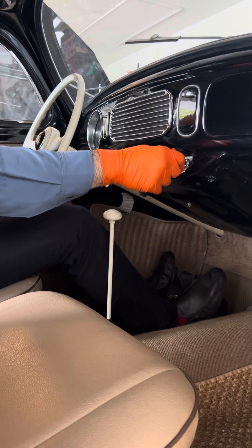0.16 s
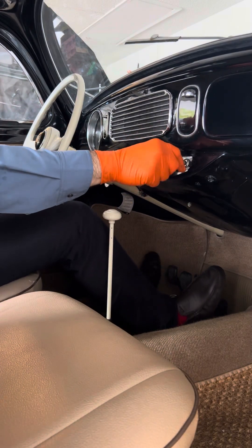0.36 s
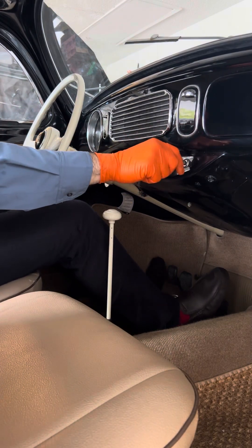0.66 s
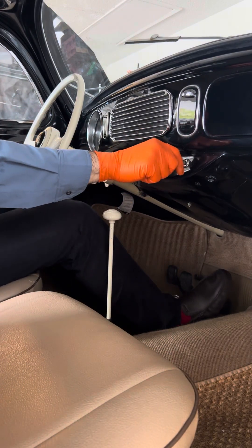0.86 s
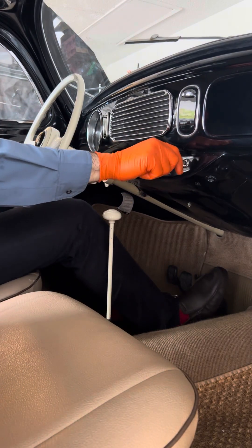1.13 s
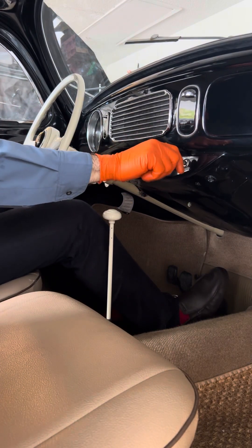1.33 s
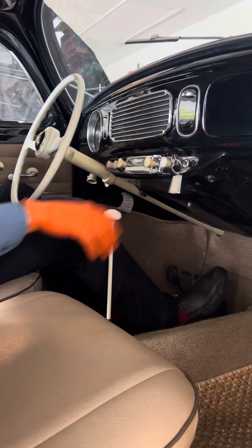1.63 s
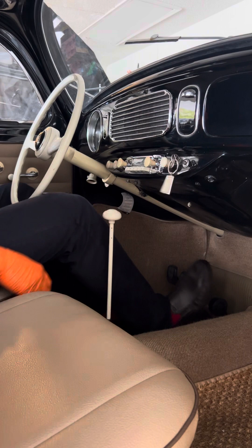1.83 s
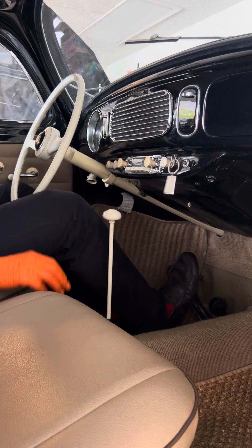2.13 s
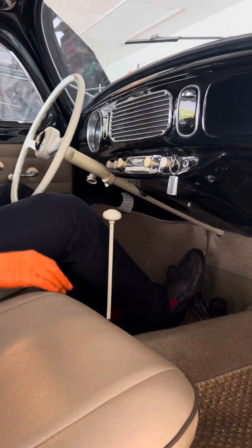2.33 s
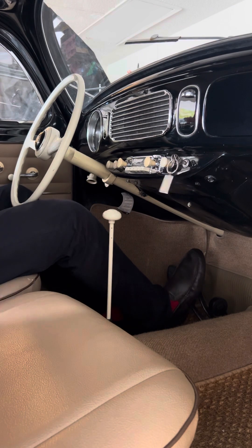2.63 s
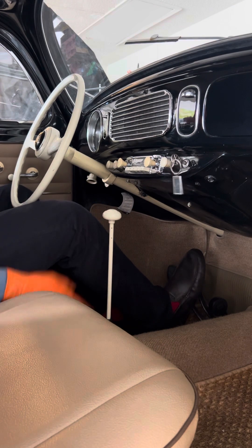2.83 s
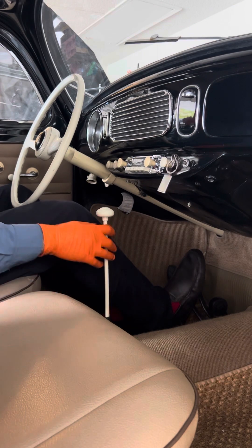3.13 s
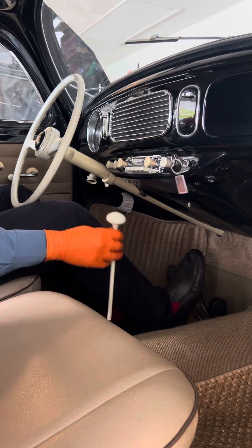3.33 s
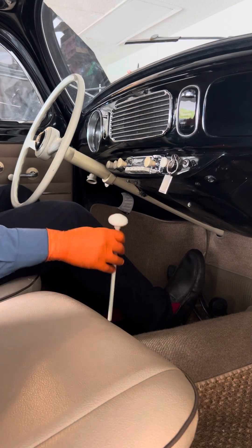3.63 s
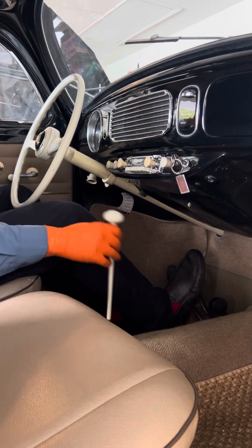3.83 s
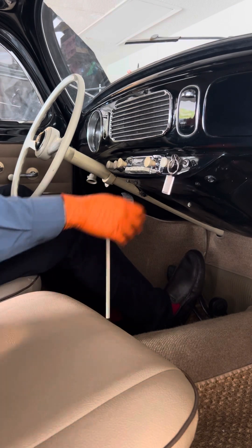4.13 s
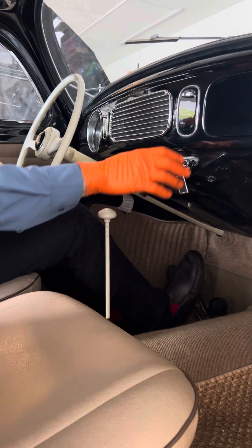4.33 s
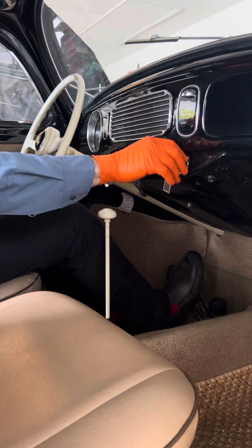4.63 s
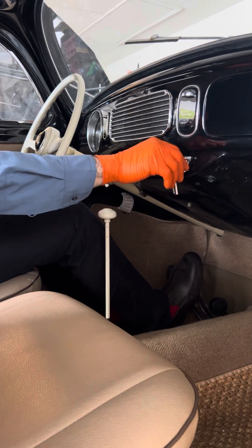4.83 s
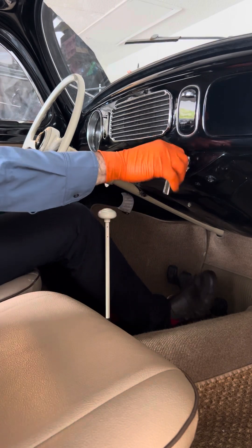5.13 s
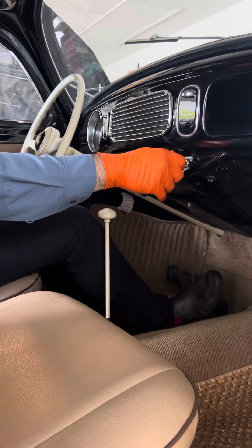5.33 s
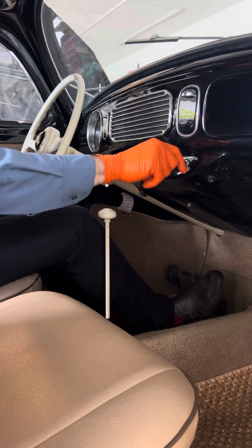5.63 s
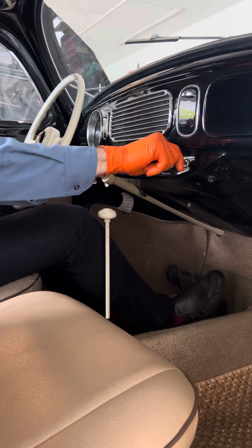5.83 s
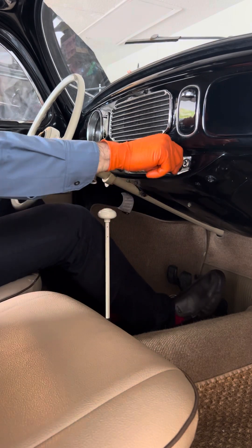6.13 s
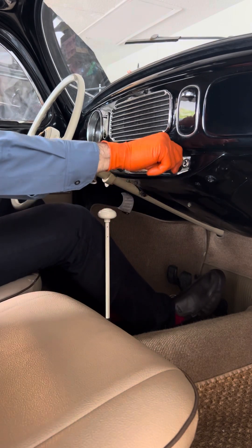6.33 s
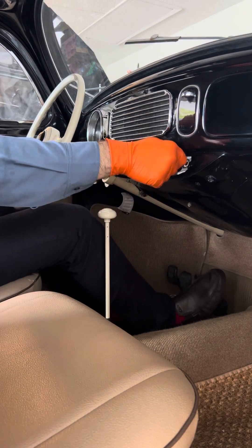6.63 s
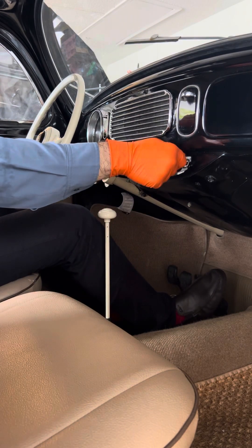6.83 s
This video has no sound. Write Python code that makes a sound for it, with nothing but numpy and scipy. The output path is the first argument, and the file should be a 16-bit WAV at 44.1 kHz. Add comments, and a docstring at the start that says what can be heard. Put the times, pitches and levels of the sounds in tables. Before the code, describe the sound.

Close inside a small, quiet old car: shoe soles creak on pedals, cloth rustles and the floor thuds softly. A dashboard switch snaps back sharply. A gear lever is waggled in neutral, clunking and rattling loudly through the steel floor. Keys jingle faintly, the ignition lock clicks, and at the very end the starter engages with a rasp and low electric hum, ending abruptly.

```python
"""Starting an old car

Inside an old air-cooled car, the driver treads the pedals, lets a dashboard switch snap back and waggles
the gear lever in neutral, which knocks through the steel floor. The keys jingle, the ignition lock clicks
round, and the starter engages and begins to turn the engine. Blows are dying tones and short noise bursts,
rubbing and scraping are shaped noise, and the starter is a hum with a rasp. A small cabin adds its echo."""
import sys
import numpy as np
from scipy import signal
from scipy.fft import rfft, irfft
from scipy.io import wavfile
from scipy.ndimage import uniform_filter1d

SR = 44100
rng = np.random.default_rng(int(sys.argv[2]) if len(sys.argv) > 2 else 0)


def master(y):
    """Save y as 16-bit WAV."""
    cut = np.clip(np.atleast_2d(y).T, -1, 1)
    pcm = np.round(cut * 32767)  # scale
    wavfile.write(sys.argv[1], SR, pcm.astype(np.int16))


N = 306936
TIME = np.arange(N) / SR  # seconds
AGE = TIME[:SR // 2]  # seconds since a blow

# In all tables, t60_s is the time to die away by 60 dB.
# In colours and modes, level_db counts only relative to the other rows.

# the quiet cabin's air: pitch_hz, level_db (per Hz)
AIR_COLOUR = [(20, -21), (44, -4.5), (106, -4.5), (165, -13), (320, -21.5), (620, -35), (900, -39.5),
              (2700, -46.5), (4000, -52.5), (16000, -72)]
AIR_DB = -48
# the car sways on its springs while the lever is shaken: peak_s, half_width_s, level_db
SWAYS = [(3.54, 0.045, -29.5), (3.831, 0.03, -27.5), (4.06, 0.043, -29)]
SWAY_HZ = 46
# faint thin whistles: peak_s, pitch_hz
WHISTLES = [(5.78, 2580), (5.92, 2600), (6.53, 2530)]
# how fast each band of the cabin's echo dies: pitch_hz, t60_s
CABIN_ECHO = [(100, 0.76), (800, 0.17), (3000, 0.4), (15000, 0.17)]

# sleeve, glove and seat rubbing: start_s, length_s, level_db, brightness_db_per_octave
RUBS = [(0.064, 0.23, -58.5, 0), (0.414, 0.23, -62, 1.5), (0.635, 0.12, -52.5, -.5),
        (0.869, 0.088, -44.5, -4), (1.523, 0.25, -61, -1), (1.656, 0.64, -59.5, -.5),
        (2.038, 0.11, -52, -2), (2.223, 0.28, -60.5, 2), (2.41, 0.25, -50, -2), (2.525, 0.026, -50.5, 5),
        (2.574, 0.1, -60, 3.5), (2.648, 0.17, -63.5, 5.5), (4.302, 0.59, -58, -1), (4.92, 0.06, -54.5, -1)]
# rubbing cloth: pitch_hz, level_db (per Hz)
RUB_COLOUR = [(200, 17), (800, 2), (2200, -4), (4000, -8), (7500, -10.5), (10000, -28.5), (16000, -25.5)]

# feet, pedals and the heel of the lever thudding on the floor: start_s, level_db, pitch_hz
THUDS = [(0.695, -38, 149), (0.731, -32, 104), (0.82, -33.5, 137), (0.857, -29.5, 91), (0.923, -33, 107),
         (1.853, -32.5, 142), (2.105, -30.5, 109), (2.452, -37, 144), (3.018, -21, 145), (3.71, -21, 125),
         (4.973, -30, 151)]
THUD_T60_S = .11
# the floor drones while a pedal is pushed down
DRONE_START_S, DRONE_LENGTH_S, DRONE_HZ, DRONE_DB = 5.02, 0.21, 96, -44
# rubber soles stick and slip on the pedals: slip_s, level_db
CREAKS = [(.023, -34), (.042, -34.5), (.29, -34), (.321, -42), (.358, -35.5), (.398, -41), (.45, -39.5),
          (.484, -36.5), (.823, -35), (.987, -43), (1.032, -45), (1.845, -32), (1.857, -34.5),
          (1.985, -38.5), (2.018, -34), (5.17, -41.5)]
# creaking soles, also used for fidgeting: pitch_hz, level_db (per Hz)
CREAK_COLOUR = [(100, -21), (230, -2), (380, 5.5), (500, -6.5), (700, -17), (1200, -21.5), (2200, -24),
                (16000, -64)]

# the key bunch swinging: start_s, level_db
JINGLES = [(1.645, -56), (4.396, -51.5), (4.441, -57.5), (4.46, -56), (4.567, -52), (5.136, -62.5)]
# ringing of the keys: pitch_hz, level_db, t60_s
KEY_MODES = [(5264, 1.5, 0.039), (6900, -6, 0.026), (8670, -4.5, 0.03), (12400, -6, 0.023),
             (13500, -12, 0.03)]
TINKLE_SPAN_S, TINKLE_DB = (4.37, 4.7), -66  # lighter touches while the hand gathers the keys

# light taps of small hard parts (key, knobs, trim, linkage): start_s, level_db, ring_hz
TAPS = [(.675, -45.5, 2170), (.906, -48, 790), (0.9513, -48, 2380), (5.723, -57, 1970), (3.908, -34, 8500),
        (4.968, -49, 2040), (5.313, -52, 2980)]
# clicks of the switch, key and ignition lock: start_s, level_db, brightness_db_per_octave
CLICKS = [(1.341, -48, -3.5), (1.533, -25, 0.5), (4.968, -36.5, -5.5), (5.135, -42.5, -5),
          (5.313, -45.5, -5), (6.185, -43.5, 2), (6.242, -47, -2), (6.331, -45, -3.5), (6.359, -39, 1),
          (6.367, -35.5, -2.5), (6.577, -52, 1)]
# clicks and taps: pitch_hz, level_db (per Hz)
CLICK_COLOUR = [(100, -5), (250, 14), (760, 8), (1250, 4), (1450, -2.5), (2000, 5), (2800, 0), (4200, -2.5),
                (7600, -4.5), (10000, -18), (15500, -19.5)]
# ringing of the steel dashboard: pitch_hz, level_db, t60_s
DASH_MODES = [(748.3, -14.5, 0.06), (2690, -18, 0.056), (3140, -16, 0.05)]
# ring time of a neutral click; it halves for this much more brightness (dB per octave)
CLICK_T60_S, CLICK_HALVING = 0.06, 3.1
# the dashboard switch springs back; brightness in dB per octave
SWITCH_START_S, SWITCH_DB, SWITCH_BRIGHTNESS, SWITCH_T60_S = 1.4988, -17.5, 5.43, 0.052
# it rattles: each contact comes after a longer gap, weaker and duller
RATTLE_GAP_S, RATTLE_STRETCH, RATTLE_LOSS_DB, RATTLE_DULLING = 0.0041, 1.4, 3.5, 2.4

START_S = 6.598  # the starter engages
# the starter spins up, then sags under load: time_s, hum_hz
STARTER_SPEED = [(6.63, 124.6), (6.66, 129), (6.718, 171), (6.748, 181.1), (6.96, 166.2)]
# make-up of the hum: multiple_of_hum_hz, level_db
HUM_ORDERS = [(.5, -2), (1, 8.5), (2, -11)]
# the hum swells as the motor takes load: peak_s, half_width_s, level_db
SURGES = [(6.689, 0.028, -20), (6.807, 0.037, -24), (6.89, 0.019, -25)]
# strength of the gear rasp over time: time_s, level_db
RASP_LEVEL = [(6.591, -89), (6.603, -45.5), (6.631, -30), (6.659, -26), (6.708, -41.5), (6.83, -48.5),
              (6.926, -35), (6.96, -36.5)]
# gear rasp, also the touch of keys: pitch_hz, level_db (per Hz)
RASP_COLOUR = [(400, -16), (700, 1.5), (3600, 1.5), (8500, -6), (10500, -15.5), (12500, -10.5),
               (16000, -29)]
# low shudder of the starting engine: pitch_hz, level_db (per Hz)
SHUDDER_COLOUR = [(50, -8.5), (84, -3), (170, 1), (236, 0), (310, -8), (500, -1.5), (590, -14),
                  (900, -18.5), (3000, -48.5)]
# body panels ring in turn as the starter shakes them: peak_s, half_width_s, level_db, pitch_hz
PANELS = [(6.633, 0.012, -25.5, 237), (6.665, 0.038, -28.5, 528), (6.735, 0.024, -35, 484),
          (6.87, 0.033, -38, 505), (6.945, 0.016, -34, 350)]

# gear lever thrown across its gate: start_s, thump_db, clack_db
THROWS = [(3.303, -25, -40), (3.5742, -21, -38.5), (3.826, -14.5, -31.5)]
SEAT_S = 0.014  # a throw takes up the play with a light, hard tick and seats this much later
# taking up the play, one row: thump_db, clack_db, tick_db
PLAY_DB = [-34.5, -52, -40]
THROW_RING_HZ, SEAT_TICK_DB = 4800, -46
# gear lever knocking against its stops: start_s, thump_db, clack_db, steel_tick_db, steel_ring_hz
KNOCKS = [(3.021, -34, -40.5, -55, 4650), (3.035, -28, -31.5, -52.5, 4500), (3.064, -30, -37, -59, 6650),
          (3.3906, -32.5, -36, -44.5, 4680), (3.4127, -29, -45, -66, 4670), (3.4565, -23, -28, -41.5, 6560),
          (3.514, -26.5, -43, -60, 6630), (3.633, -31.5, -50, -56, 4700), (3.6804, -27.5, -35, -39.5, 6780),
          (3.7298, -20.5, -30, -37, 6700), (3.7743, -25, -42, -63, 6730), (3.8824, -21, -30, -46, 4800),
          (3.9081, -22.5, -32.5, -36.5, 6700), (3.9476, -19.5, -26, -35, 6690),
          (3.9935, -19.5, -30.5, -50, 6700)]
REBOUND_DB = -14.5  # relative to the knock
# what the lever, its linkage and the floor ring with: pitch_hz, level_db, t60_s
LEVER_MODES = [(125.3, -5, 0.37), (148.14, -3, 0.45), (167.3, -0.5, 0.27), (197, 5, 0.15),
               (236.9, 1.5, 0.19), (390.8, 1.5, 0.1), (461.3, -5, 0.095), (665, -1, 0.05),
               (1016, -1.5, 0.034), (1244, -7, 0.083), (1550, -12.5, 0.054)]
# the noisy crack of a lever blow: pitch_hz, level_db (per Hz)
LEVER_CRACK = [(60, -35), (160, 8.5), (450, 9), (800, -1.5), (1300, -2.5), (2600, -20.5), (8500, -31),
               (10000, -57), (16000, -47)]
# the cabin's boom builds up slowly and varies less than the blows (dB of boom per dB of thump)
BOOM_BASE_DB, BOOM_PER_THUMP, BOOM_RISE_S = -15, 0.38, 0.042
# the shift rod slides with every throw, louder after a hard one (dB of slide per dB of clack)
SLIDE_LAG_S, SLIDE_BASE_DB, SLIDE_PER_CLACK, SLIDE_T60_S = 0.011, -20, 0.54, 0.23
# the sliding rod: pitch_hz, level_db (per Hz)
SLIDE_COLOUR = [(500, 10), (2000, 5), (3600, 3), (7000, -5), (9500, -3), (16000, -19.5)]
# the gearbox housing sings with whatever scrapes in it
GEARBOX_HZ, GEARBOX_Q, GEARBOX_DB = [3547, 4470, 6400, 8280], 73, 6.5

# how far the left port leads, before the bass is narrowed: pitch_hz, lead_radians
PORT_PHASE = [(4600, -0.062), (5400, -1.2), (10000, -1.2), (15000, -1.6)]
# diffuse difference between the ports, before the bass is narrowed: pitch_hz, level_db
WIDTH = [(170, -12.5), (480, -1), (1000, -4), (3000, -7.5), (14000, -9)]
MIC_LOW_HZ, MIC_ORDER = 33.4, 4  # the microphone's bass roll-off
TOP_HZ = 16100  # the recorder's band limit


def amp(db):
    """Turns decibels into a plain gain."""
    return 10 ** (np.asarray(db) / 20)


def unit(x):
    """Scales a sound to rms 1."""
    return x / np.sqrt(np.mean(x ** 2) + 1e-20)


def crest(x, size=220):
    """Scales a sound so that its loudest few milliseconds have rms 1."""
    return x / np.sqrt(uniform_filter1d(x ** 2, size).max() + 1e-20)


def read(points, hz):
    """Reads a curve between its points, along a logarithmic pitch scale."""
    point_hz, value = np.transpose(points)
    return np.interp(np.log(hz + 1), np.log(point_hz + 1), value)


def add(mix, start_s, sound):
    """Adds a sound into the mix at its start time."""
    part = mix[max(round(start_s * SR), 0):][:len(sound)]
    part += sound[:len(part)]


def fade(t60_s):
    """A natural die-away after a blow."""
    return np.exp(-np.log(1000) * AGE / t60_s)


def noise(size=N):
    """Plain hiss."""
    return rng.standard_normal(size)


def burst(t60_s):
    """A dying burst of hiss, like very many modes struck at once."""
    return noise(len(AGE)) * fade(t60_s)


def waver(depth_db, size, length=N):
    """A gain that wanders at random; depth_db is its rms swing, size its smoothing in samples."""
    return amp(depth_db * unit(uniform_filter1d(noise(length), size)))


def bump(peak_s, half_width_s):
    """A smooth rise to 1 and fall again."""
    return np.exp(-((TIME - peak_s) / half_width_s) ** 2)


def swell(peak_s, half_width_s, db, hz):
    """A resonance that builds up to its peak and dies again."""
    return amp(db) * bump(peak_s, half_width_s) * np.sin(2 * np.pi * (hz * (TIME - peak_s) + rng.random()))


def level(time_s, db):
    """A gain that follows a dB curve and is silent outside it."""
    return amp(np.interp(TIME, time_s, db, left=-np.inf, right=-np.inf))


def colour(x, points, tilt=0, size=4096):
    """Causal filter of unit power with the given spectrum, tilted in dB per octave above 250 Hz."""
    hz = abs(np.fft.fftfreq(size, 1 / SR))
    gain_db = read(points, hz) + tilt * np.log2(np.maximum(hz, 250))
    log_gain = np.log(amp(gain_db))
    # the Hilbert transform gives the phase that makes the filter answer as early as possible
    response = np.fft.ifft(np.exp(np.conj(signal.hilbert(log_gain)))).real
    return signal.oaconvolve(x, response / np.linalg.norm(response))[:len(x)]


def resonate(x, hz, q):
    """One resonance of gain 1."""
    return signal.lfilter(*signal.iirpeak(hz, q, fs=SR), x)


def ring(modes, detune, spread_db):
    """Dying modes; every blow lands on another spot and so weighs and tunes them differently."""
    out = np.zeros(len(AGE))
    for hz, db, t60_s in modes:
        weigh, tune = rng.uniform(-1.15, 1, 2)
        tone = np.sin(2 * np.pi * hz * (1 + detune * tune) * AGE)
        out += amp(db + spread_db * weigh) * fade(t60_s) * tone
    return out


def through_floor(x, lag_s):
    """Bending waves in sheet steel: bass arrives late, so each blow chirps downward."""
    hz = np.fft.rfftfreq(2 * N, 1 / SR)
    turns = lag_s * (2 * np.sqrt(500 * hz) - hz / 4)  # the delay at 500 Hz is three quarters of lag_s
    return irfft(rfft(x, 2 * N) * np.exp(-2j * np.pi * turns))[:N]


def friction(grain_db=2):
    """Noise that catches and slips in grains of about a millisecond."""
    return unit(noise() * waver(grain_db, 50))


def rumble():
    """The steady air of the cabin, and its lowest resonance stirred by the swaying body."""
    return amp(AIR_DB) * colour(noise(), AIR_COLOUR) + sum(swell(*row, SWAY_HZ) for row in SWAYS)


def whistles(peak_db=-78, half_width_s=0.039, q=22):
    """Faint wavering tones, made of narrow bands of noise, that come and go."""
    out = np.zeros(N)
    for peak_s, hz in WHISTLES:
        tone = unit(resonate(resonate(noise(), hz, q), hz, q))
        out += amp(peak_db) * bump(peak_s, half_width_s) * tone
    return out


def fidgets(per_s=12, size_db=-62, t60_s=0.12, tilt=1.5, still_s=5.3):
    """Faint scuffs at random as the driver shifts in the seat, until the key is in the lock."""
    starts = (rng.random(N) < per_s / SR) * rng.random(N) * (TIME < still_s)
    strength = signal.oaconvolve(starts, fade(t60_s))[:N]
    return amp(size_db) * colour(strength * noise(), CREAK_COLOUR, tilt)


def cloth(swell_db=2.5, crackle_db=-10, crackles_per_s=70, crackle_q=5, count=10):
    """Strokes of fine friction swell and fade; creases crackle in them, each at its own pitch."""
    out, creases = np.zeros((2, N))
    for hz in np.geomspace(900, 8000, count):
        crackles = noise() * (rng.random(N) < crackles_per_s / SR)
        creases += unit(resonate(crackles, hz, crackle_q))
    rubbing = unit(waver(swell_db, 900) * friction())  # the pressure of the hand varies
    rustle = rubbing + amp(crackle_db) * unit(creases)
    for start_s, length_s, db, tilt in RUBS:
        stroke = rustle[round(start_s * SR):][:round(length_s * SR)]
        add(out, start_s, amp(db) * unit(colour(stroke, RUB_COLOUR, tilt) * signal.windows.hann(len(stroke))))
    return out


def footwell(rise_s=0.0053):
    """Soft blows that set the floor booming for a few cycles, and one short drone."""
    out = np.zeros(N)
    for start_s, db, hz in THUDS:
        thud = np.sin(2 * np.pi * hz * AGE) * fade(THUD_T60_S) * (1 - fade(rise_s))
        add(out, start_s, amp(db) * crest(thud))
    t = AGE[AGE < DRONE_LENGTH_S]
    drone = np.sin(2 * np.pi * DRONE_HZ * t) * signal.windows.tukey(len(t))
    add(out, DRONE_START_S, amp(DRONE_DB) * unit(drone))
    return out


def pedals(scuff=0.19, scuff_t60_s=0.092):
    """Each slip of a sole is one soft push heard through the floor, with a little scuffing."""
    pushes, scuffs = np.zeros((2, N))
    for slip_s, db in CREAKS:
        slip = np.convolve(burst(.014), signal.windows.hann(58))  # soft rubber dulls it
        add(pushes, slip_s - .004, amp(db) * crest(colour(slip, CREAK_COLOUR)))
        add(scuffs, slip_s, amp(db) * burst(scuff_t60_s))
    return through_floor(pushes, lag_s=0.008) + scuff * colour(scuffs, CREAK_COLOUR, tilt=2.5)


def keys(tick=2.2, tick_t60_s=0.025, rise_s=0.0066, bounce_s=0.0063, bounce_db=-6, count=12):
    """Small brass plates touch, ring and bounce once off each other."""
    out = np.zeros(N)
    tinkles = [(start_s, TINKLE_DB) for start_s in rng.uniform(*TINKLE_SPAN_S, count)]
    for start_s, db in JINGLES + tinkles:
        for k in range(2):  # the touch, then its bounce
            touch = ring(KEY_MODES, detune=0.06, spread_db=3.5)
            touch += tick * colour(burst(tick_t60_s), RASP_COLOUR)
            add(out, start_s + k * bounce_s, amp(db + k * bounce_db) * crest(touch * (1 - fade(rise_s))))
    return out


def taps(q=5, t60_s=0.03, rise_s=.008, dash_db=-18):
    """Small hard parts touch: a short ring at one broad resonance, and a little of the dashboard."""
    out = np.zeros(N)
    for start_s, db, hz in TAPS:
        touch = burst(t60_s) * (1 - fade(rise_s))
        tap = resonate(touch, hz, q) + amp(dash_db) * touch
        add(out, start_s, amp(db) * crest(colour(tap, CLICK_COLOUR)))
    return out


def contacts(count=4):
    """The rattle of the switch, then the single clicks: start_s, level_db, t60_s, brightness."""
    rows, start_s = [], SWITCH_START_S
    for k in range(count):
        brightness = SWITCH_BRIGHTNESS - k * RATTLE_DULLING
        rows.append((start_s, SWITCH_DB - k * RATTLE_LOSS_DB, SWITCH_T60_S, brightness))
        start_s += RATTLE_GAP_S * RATTLE_STRETCH ** k
    for start_s, db, tilt in CLICKS:
        rows.append((start_s, db, CLICK_T60_S * 2 ** (-tilt / CLICK_HALVING), tilt))
    return rows


def switches(chatter=0.53):
    """Sprung contacts strike the dashboard, whose dense modes are the same at every snap."""
    out, panel = np.zeros(N), noise(len(AGE))
    for start_s, db, t60_s, tilt in contacts():
        snap = (panel + chatter * noise(len(AGE))) * fade(t60_s)
        snap += ring(DASH_MODES, detune=0, spread_db=0)
        add(out, start_s, amp(db) * crest(colour(snap, CLICK_COLOUR, tilt)))
    return out


def jolt(rise_s, fall_s, peak_db, hold_db):
    """A gain that swells as the starter engages, then settles on a held level."""
    t = np.maximum(TIME - START_S, 0)
    settle = np.exp(-np.maximum(t - rise_s, 0) / fall_s)
    return np.minimum(t / rise_s, 1) ** 2 * (amp(hold_db) + (amp(peak_db) - amp(hold_db)) * settle)


def starter(mesh_depth=0.16, grit_db=1.5, wobble=0.006, rock_hz=43):
    """The pinion rasps on the flywheel and the motor hums, while the engine rocks on its mounts."""
    unsteady = 1 + wobble * unit(uniform_filter1d(noise(), 400))
    speed_hz = np.interp(TIME, *np.transpose(STARTER_SPEED)) * unsteady
    angle = 2 * np.pi * np.cumsum(speed_hz) / SR
    hum = sum(amp(db) * np.sin(multiple * angle) for multiple, db in HUM_ORDERS)
    load = sum(amp(db) * bump(peak_s, half_width_s) for peak_s, half_width_s, db in SURGES)

    casing = burst(0.31)  # dense modes of the steel housing
    scrape = colour(signal.oaconvolve(noise(), casing)[:N], RASP_COLOUR)
    mesh = 1 + mesh_depth * np.cos(angle)  # teeth scrape once a cycle
    rasp = scrape * waver(grit_db, 100) * mesh

    shudder = colour(noise(), SHUDDER_COLOUR)
    rock = np.sin(2 * np.pi * rock_hz * (TIME - START_S))
    out = level(*np.transpose(RASP_LEVEL)) * unit(rasp) + load * unit(hum)
    out += jolt(rise_s=.065, fall_s=.04, peak_db=-20, hold_db=-38) * unit(shudder)
    out += jolt(rise_s=0.11, fall_s=0.029, peak_db=-23.0, hold_db=-45) * unit(rock)
    return out + sum(swell(*row) for row in PANELS)


def gearbox(x):
    """A scrape with the narrow resonances of the housing added."""
    return x + amp(GEARBOX_DB) * sum(resonate(x, hz, GEARBOX_Q) for hz in GEARBOX_HZ)


def shift_rod():
    """A grainy scrape that dies away after the lever is thrown."""
    force = np.zeros(N)
    for start_s, _, clack_db in THROWS:
        slide = fade(SLIDE_T60_S) * (1 - fade(0.0085))
        add(force, start_s + SLIDE_LAG_S, amp(SLIDE_BASE_DB + SLIDE_PER_CLACK * clack_db) * slide)
    return gearbox(colour(force * friction(), SLIDE_COLOUR))


def lever_blows():
    """All blows of the lever, as rows like KNOCKS: two for each throw, a knock and a rebound for each stop."""
    play = [(start_s, *PLAY_DB, THROW_RING_HZ) for start_s, *_ in THROWS]
    seat = [(start_s + SEAT_S, *levels, SEAT_TICK_DB, THROW_RING_HZ) for start_s, *levels in THROWS]
    rebounds = []
    for start_s, *levels, hz in KNOCKS:
        rebounds.append((start_s + rng.uniform(.004, .016), *np.add(levels, REBOUND_DB), hz))
    return play + seat + KNOCKS + rebounds


def gear_lever(crack_db=6, crack_t60_s=0.07, chatter_db=3.0, rise_s=0.0045,
               steel_db=4, steel_t60_s=0.062, tick_t60_s=0.049):
    """Each blow ticks and rings in the steel linkage, then clacks and thumps in the floor and booms."""
    steel, floor = np.zeros((2, N))
    linkage = colour(burst(tick_t60_s), LEVER_CRACK)  # dense modes, alike at every blow
    edges_hz = [(80, 300), (300, 800), (800, 3000), (2600, 16000)]  # boom, thump, clack, tick
    *bands, treble = [signal.butter(3, edges, "band", fs=SR, output="sos") for edges in edges_hz]
    for start_s, thump_db, clack_db, tick_db, ring_hz in lever_blows():
        chatter = waver(chatter_db, 130, len(AGE))  # loose joints bounce after the blow
        crack = colour(burst(crack_t60_s) * chatter, LEVER_CRACK)
        blow = ring(LEVER_MODES, detune=0.026, spread_db=5.5) + amp(crack_db) * crack
        blow *= 1 - fade(rise_s)
        boom, thump, clack = (signal.sosfilt(band, blow) for band in bands)
        boom_gain = amp(BOOM_BASE_DB + BOOM_PER_THUMP * thump_db)
        boom = boom_gain * crest(boom * (1 - fade(BOOM_RISE_S)))
        tick = crest(signal.sosfilt(treble, linkage + crack * fade(tick_t60_s)))
        ping = np.sin(2 * np.pi * ring_hz * AGE) * fade(steel_t60_s)
        add(steel, start_s, amp(tick_db) * crest(amp(steel_db) * tick + ping))
        add(floor, start_s, boom + amp(thump_db) * crest(thump) + amp(clack_db) * crest(clack))
    return steel + through_floor(floor, lag_s=0.00142)


def cabin(x):
    """A short diffuse tail, each band dying at its own speed."""
    hz, t, bands = signal.stft(noise(len(AGE)) * (AGE > .004), SR, nperseg=256)
    decay = np.exp(-np.log(1000) * t / read(CABIN_ECHO, hz)[:, None])
    tail = signal.istft(bands * decay, SR, nperseg=256)[1]
    return signal.oaconvolve(x, tail / np.linalg.norm(tail))[:N]


def ports(x):
    """Two close microphone ports: a phase lead, plus reflections that differ above the bass."""
    hz = np.fft.rfftfreq(N, 1 / SR)
    scatter = burst(.13) * (AGE > .002)
    diffuse = signal.oaconvolve(x, scatter / np.linalg.norm(scatter))[:N]
    lead = np.tan(np.clip(read(PORT_PHASE, hz), -2, 2) / 2)
    apart = hz ** 2 / (hz ** 2 + 400 ** 2)  # long waves reach both ports alike
    side = irfft(apart * (1j * lead * rfft(x) + amp(read(WIDTH, hz)) * rfft(diffuse)), N)
    return np.array([x + side, x - side])


def scene():
    """Everything sounds in the small cabin; the sources feed its echo."""
    feet = pedals() + fidgets() + footwell()
    dash = switches() + taps() + keys() + cloth()
    motor = starter()
    lever = gear_lever() + shift_rod()
    tail = cabin(amp(-13.5) * lever + amp(-13) * dash + amp(-11.0) * (feet + motor))
    return ports(lever + dash + feet + motor + tail + whistles() + rumble())


def record(dry):
    """The microphone's bass roll-off and the recorder's band limit."""
    bass_cut = signal.butter(MIC_ORDER, MIC_LOW_HZ, "high", fs=SR, output="sos")
    treble_cut = signal.firwin(401, TOP_HZ, window=("kaiser", 9), fs=SR)
    return signal.oaconvolve(signal.sosfilt(bass_cut, dry), treble_cut[None], "same")


dry = scene()
out = record(dry)
master(out)
```